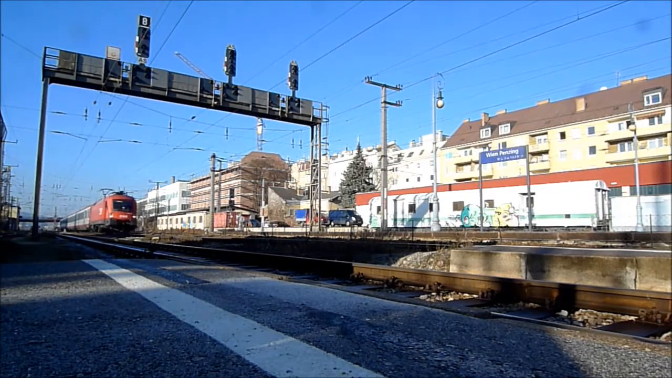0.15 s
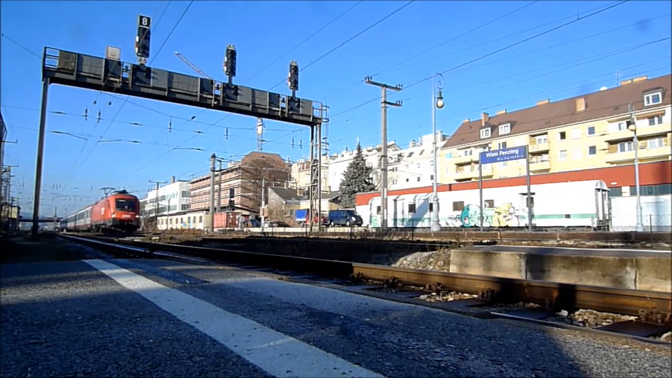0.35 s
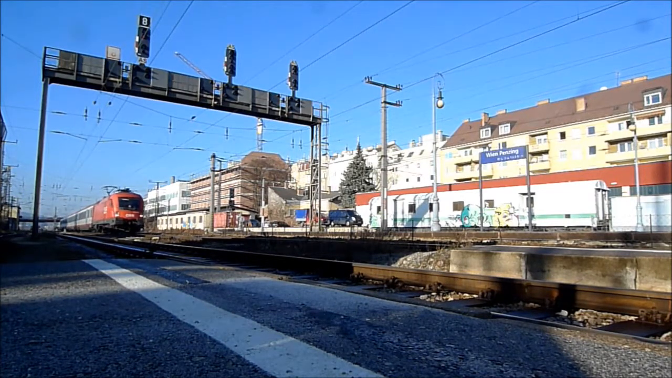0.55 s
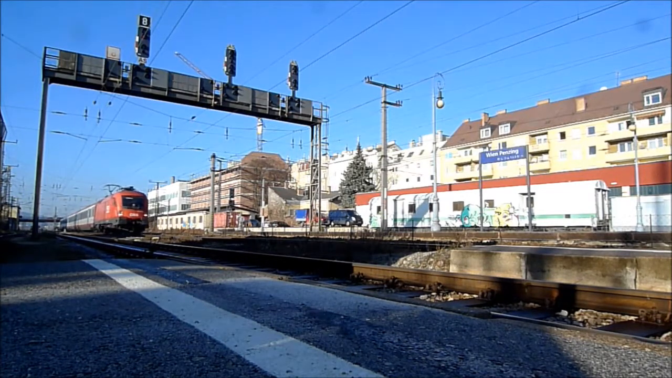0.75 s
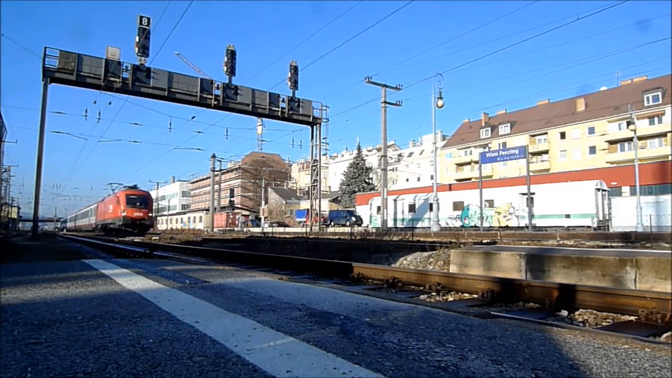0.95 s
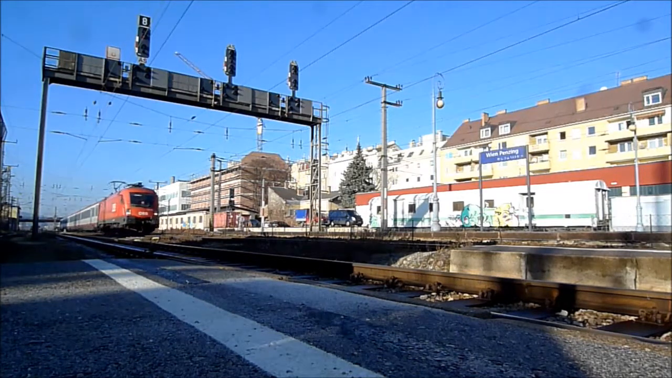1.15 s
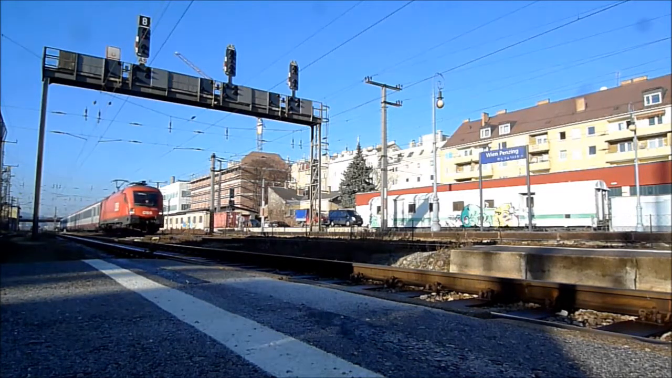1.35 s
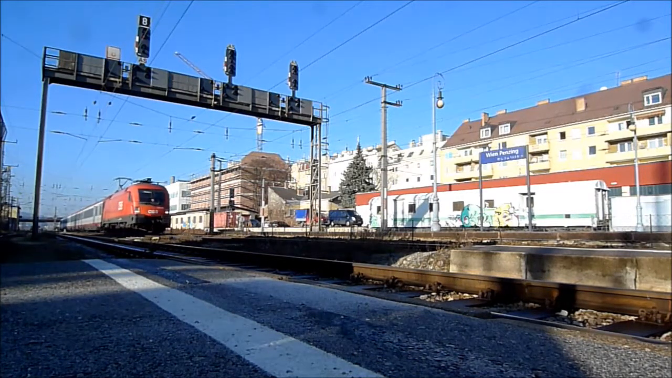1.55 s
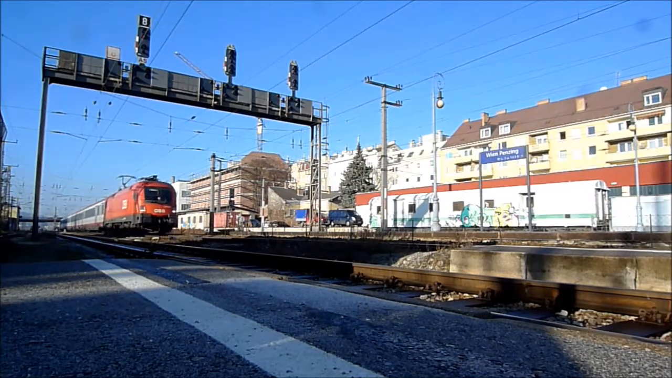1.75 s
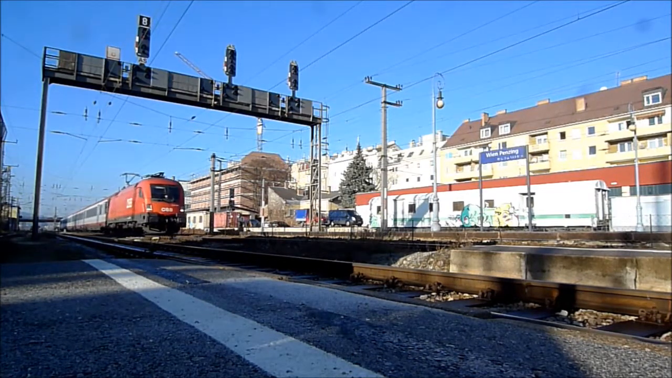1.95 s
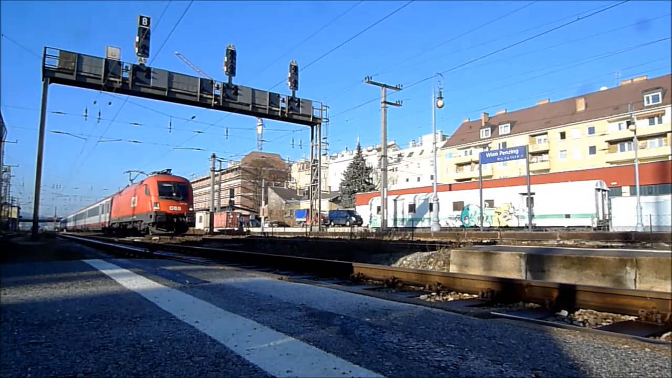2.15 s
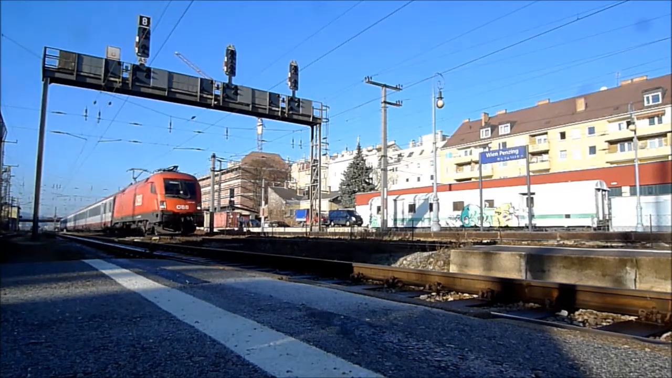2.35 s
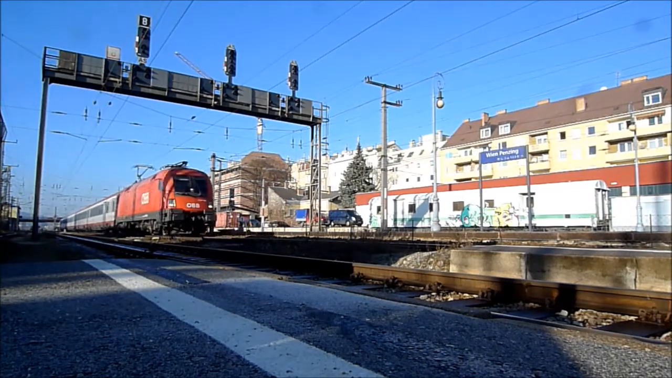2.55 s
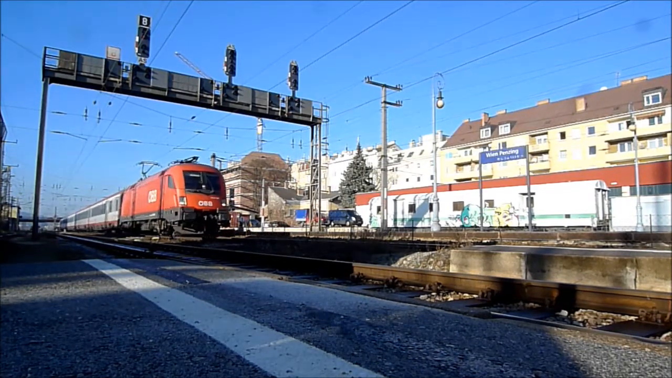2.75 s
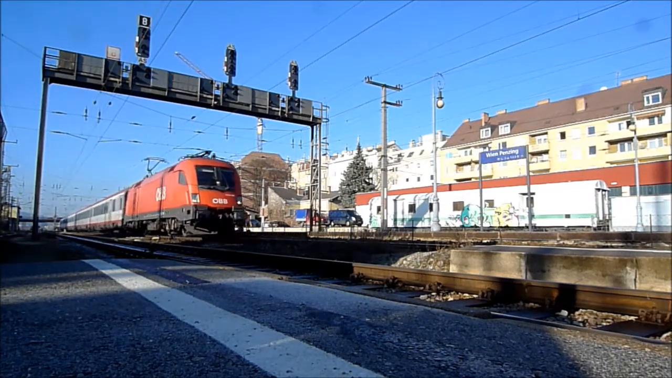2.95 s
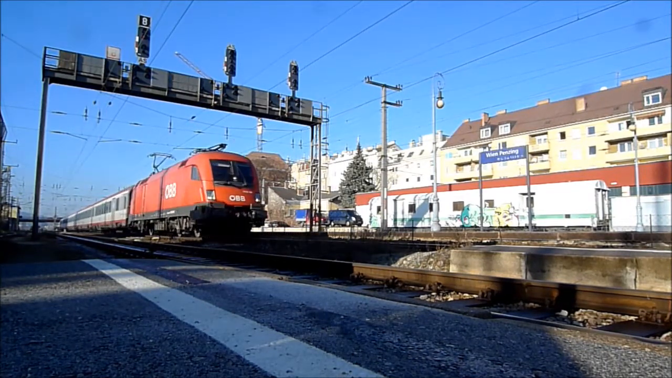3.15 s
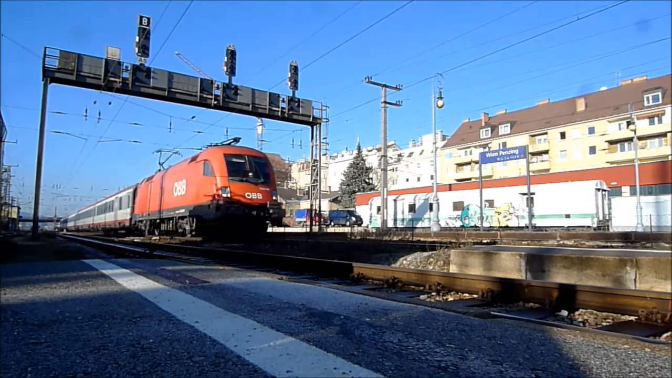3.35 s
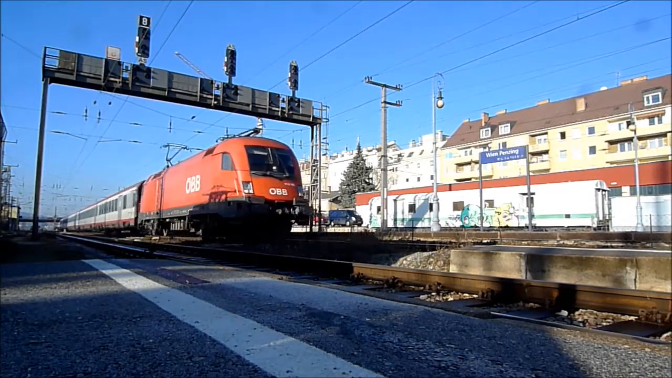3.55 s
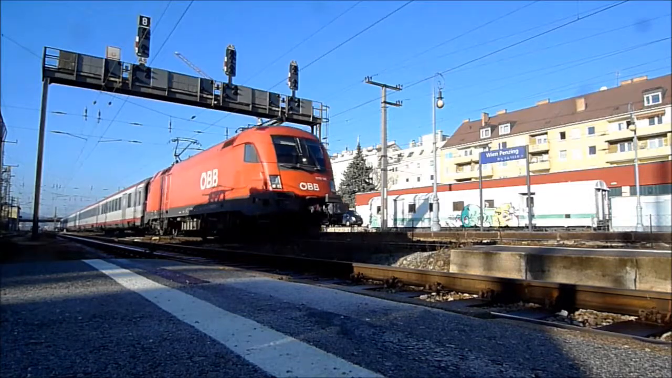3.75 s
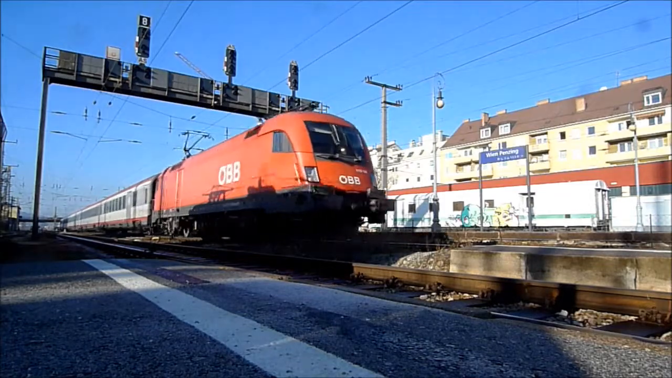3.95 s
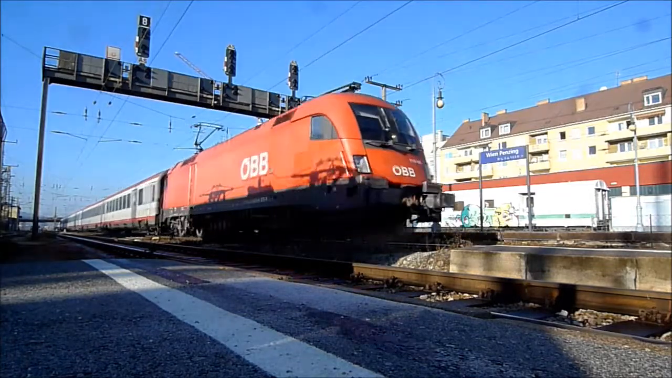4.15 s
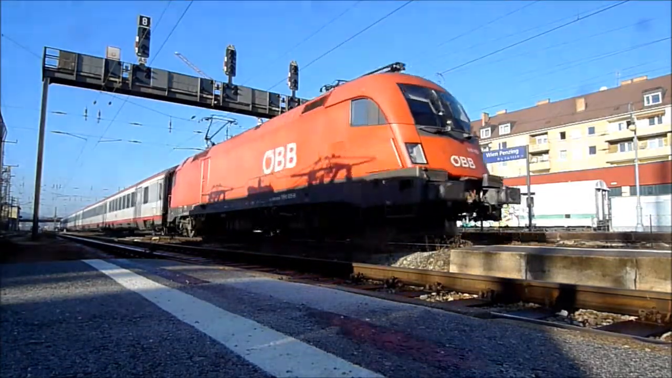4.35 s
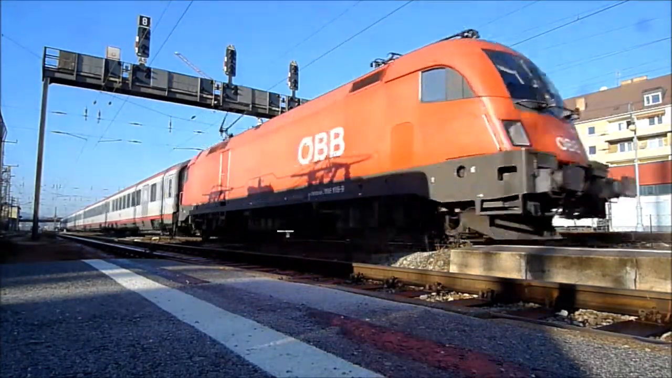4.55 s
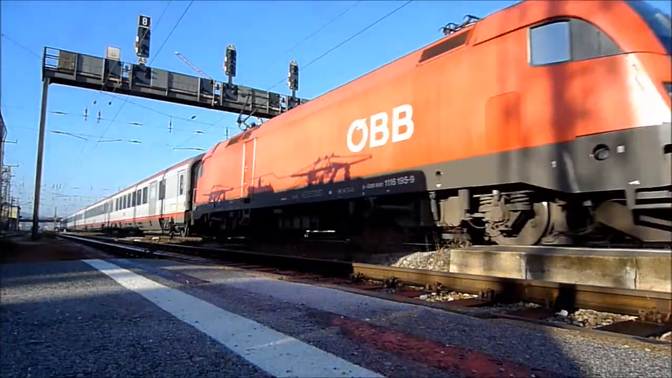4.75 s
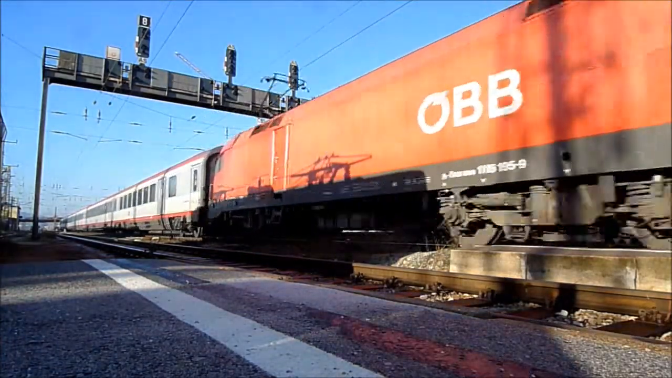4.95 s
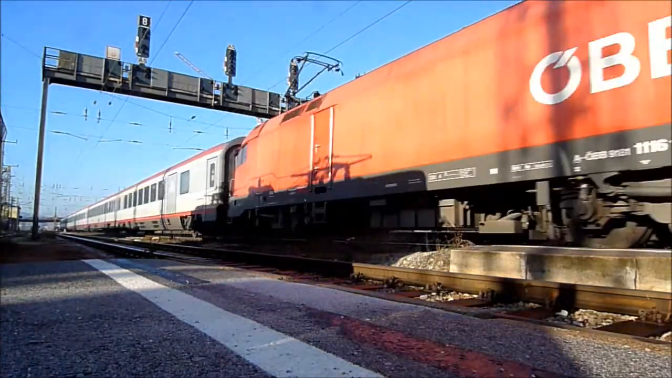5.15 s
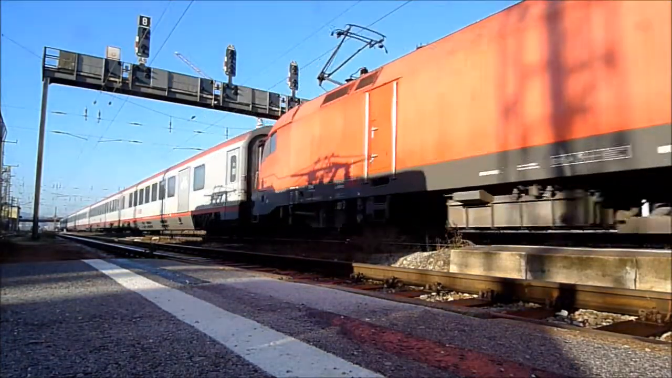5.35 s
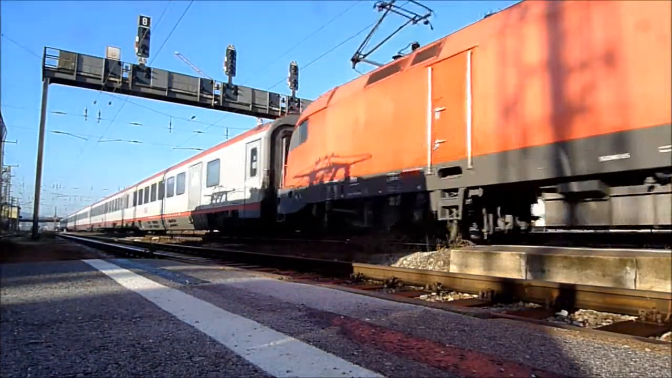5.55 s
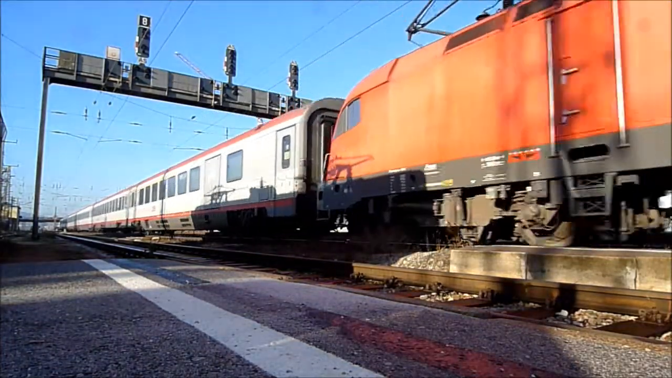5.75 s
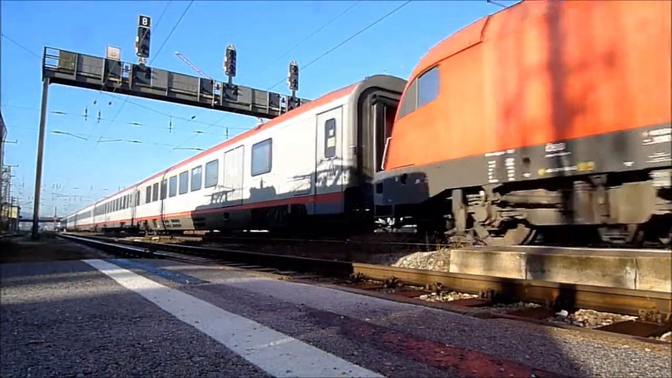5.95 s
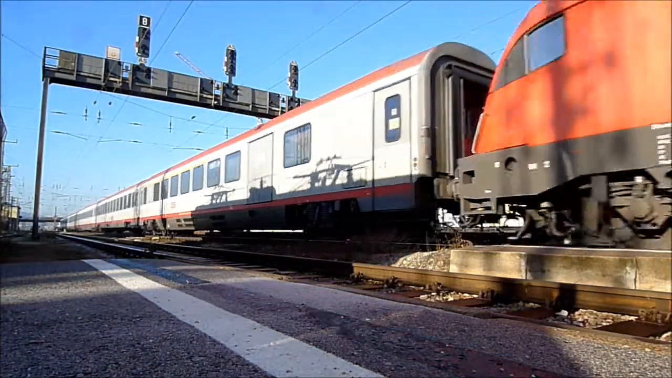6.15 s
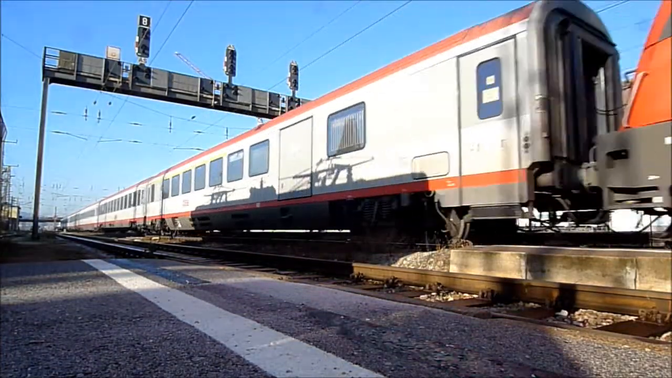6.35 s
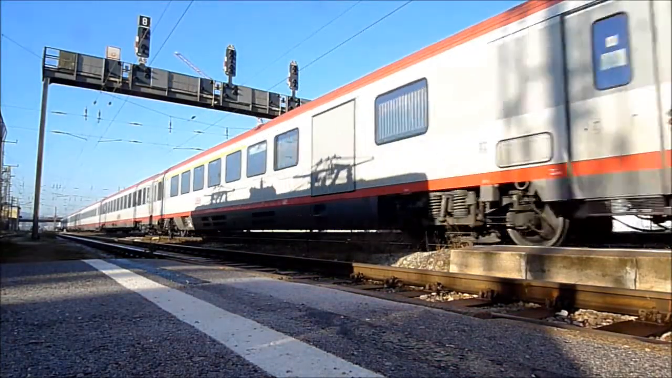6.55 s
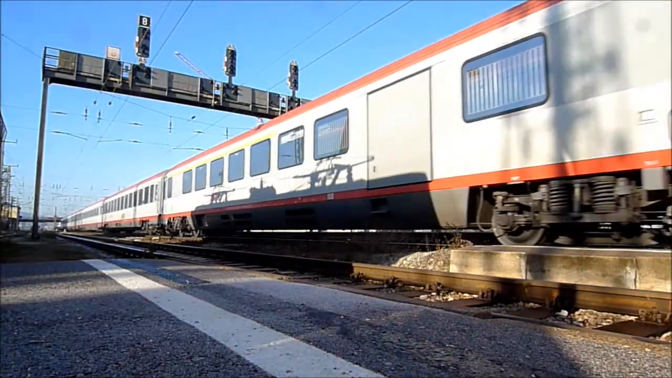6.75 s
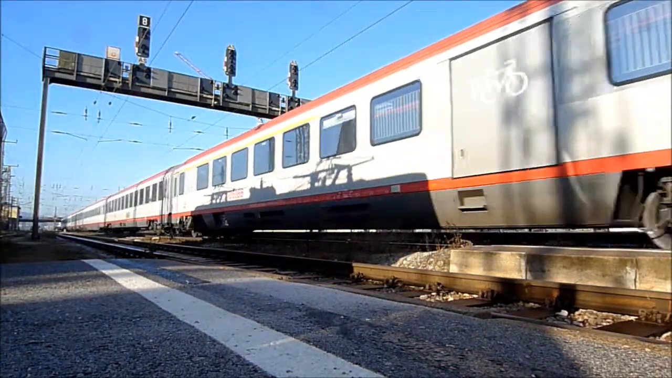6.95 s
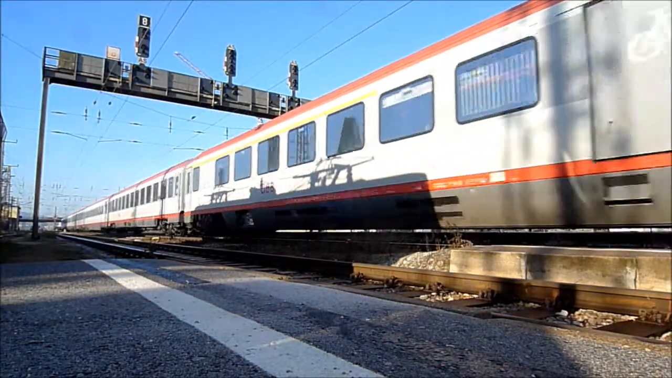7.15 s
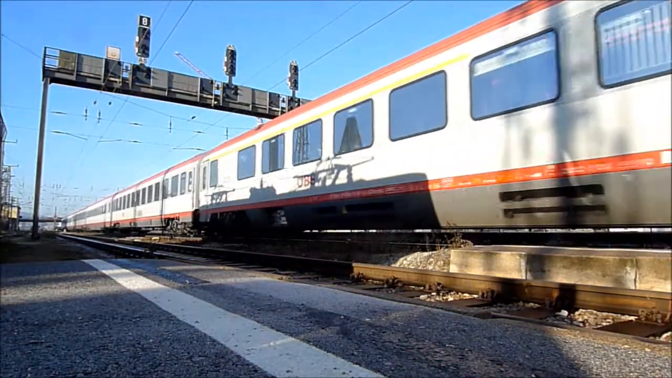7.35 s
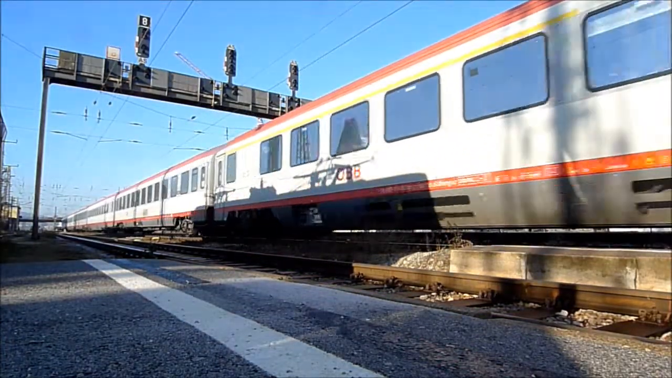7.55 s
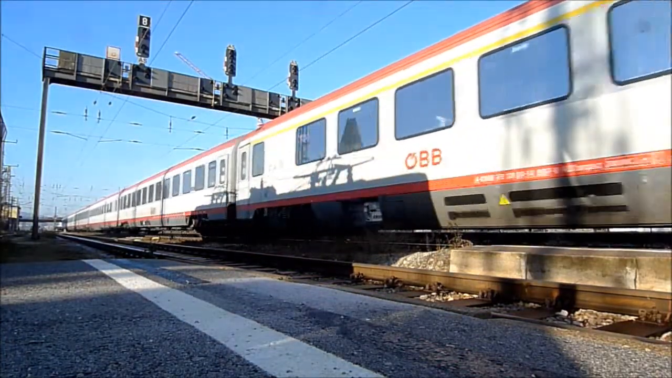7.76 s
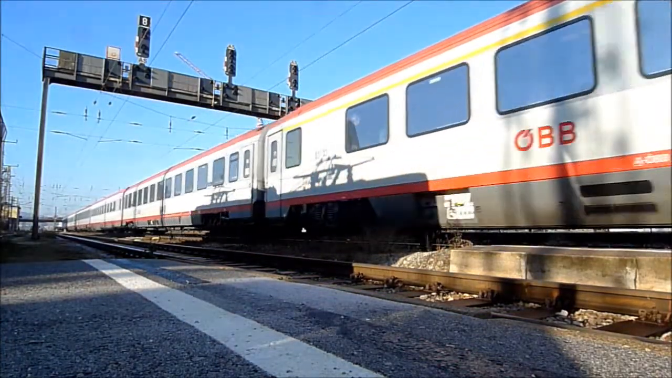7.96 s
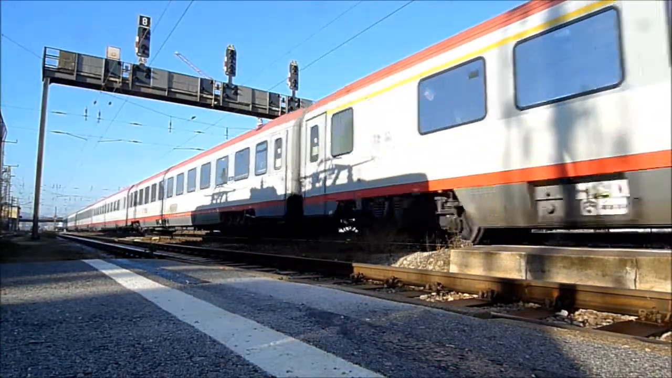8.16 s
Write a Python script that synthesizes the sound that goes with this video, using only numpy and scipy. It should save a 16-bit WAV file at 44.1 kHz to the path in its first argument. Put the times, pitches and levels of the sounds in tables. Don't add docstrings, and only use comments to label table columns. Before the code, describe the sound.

A mono outdoor sound from a fixed, low microphone beside a station track, muffled on top with faint steady hiss. From 0 to 2 s a distant low rolling drone and soft machine hum, with thin high rail singing, tiny ticks near 0.5 and 1.15 s and dull knocks from about 1.1 s. Knocks strengthen at 2.4 and 3 s, the latter with a heavy ground thump. The hum rises slightly in pitch. Around 4.05 s loose metal rattles in a bright, quick cluster, then firm knocks lead to 4.8 s. From 4.3 to 6.3 s the locomotive roars past, gear hum and blower whine beating and swelling. The roar dips around 6.6 s. At 7 to 7.7 s coach wheels bring brighter hiss, metallic ringing and rapid clacks, with a sharp tick near 7.7 s. Rolling continues to the end at about 8.2 s.

```python
import sys
import numpy as np
from scipy import signal
from scipy.io import wavfile
from scipy.ndimage import uniform_filter1d

SR = 44100
rng = np.random.default_rng(int(sys.argv[2]) if len(sys.argv) > 2 else 0)


def makeup_ratio(level_db):
    decades = np.asarray(level_db, float) / 20
    return 10 ** decades


def inscribe(sig):
    pcm = np.round(np.clip(np.atleast_2d(sig).T, -1, 1) * 32767)
    wavfile.write(sys.argv[1], SR, pcm.astype(np.int16))


N = 362502


def rms_one(x):
    return x / np.sqrt(np.mean(np.abs(x) ** 2) + 1e-20)


def band_pass(x, order, low_hz, high_hz):
    return signal.sosfilt(signal.butter(order, [low_hz, high_hz], "band", fs=SR, output="sos"), x)


def in_time(rows):
    s, *columns = np.transpose(rows)
    return [np.interp(np.arange(N) / SR, s, column) for column in columns]


def drift(rate_hz):
    every = 40
    pole = np.exp(-2 * np.pi * every * rate_hz / SR)
    noise = rng.standard_normal(N // every + 2002)
    slow = signal.lfilter([1], [1, -2 * pole, pole * pole], noise)[2000:]
    return np.interp(np.arange(N) / every, np.arange(len(slow)), rms_one(slow))


def beating_tone(hz, width_hz, rough):
    rough = np.clip(rough, 0, 1)
    phase = 2 * np.pi * np.cumsum(hz * np.ones(N)) / SR
    in_phase = np.sqrt(2 - 2 * rough) + np.sqrt(rough) * drift(width_hz)
    quadrature = np.sqrt(rough) * drift(width_hz)
    return in_phase * np.cos(phase) - quadrature * np.sin(phase)


def passing_db(closest_s, reach_s):
    return -10 * np.log10(1 + ((np.arange(N) / SR - closest_s) / reach_s) ** 2)


def beams(rows, width_s):
    return np.sqrt(sum(makeup_ratio(2 * (db + 2 * passing_db(s, width_s))) for s, db in rows))


# time in seconds, level in dB
DRONE = [(0.0, -37), (0.89, -36), (1.03, -31), (1.67, -34), (1.88, -32), (2.38, -31.5), (4.26, -27),
         (4.3, -24), (4.95, -26), (5.93, -29.5), (6.55, -31.5), (6.78, -33.5), (7.26, -25.5), (7.9, -25.5),
         (8.22, -22)]
# closest moment in seconds, level in dB, reach in seconds
WHEELSETS = [
    (4.6, -0.9, 0.89),
    (5.3, -6.5, 0.26),
    (6.1, -1, 0.54),
    (7.35, -4.5, 0.3),
    (8.9, -2, 0.92),
]


def regions():
    rumble_db = passing_db(closest_s=3.97, reach_s=1.8)
    near = [makeup_ratio(2 * (db + passing_db(s, reach))) for s, db, reach in WHEELSETS]
    rail_db = 10 * np.log10(sum(near))
    coach_hiss_db, track_hiss_db = 4, -18
    hiss = sum(near[:3]) + makeup_ratio(2 * coach_hiss_db) * sum(near[3:]) + makeup_ratio(2 * track_hiss_db)
    return np.array([rumble_db, in_time(DRONE)[0], 0.97 * rail_db, 1.59 * 10 * np.log10(hiss)])


REGION_HZ = (65, 250, 900, 2900)
# frequency in Hz, level in dB
ROAR = [(25, -16), (50, -8.5), (90, -7.5), (200, -1.5), (350, -5), (460, -7), (640, -8.5), (760, -14),
        (1100, -14), (1600, -15), (2300, -14.5), (3800, -30.5), (4300, -42), (5200, -47)]


def rolling(patchy_db):
    roar_db = -26.5
    swell = regions()
    swell = swell - 10 * np.log10(np.mean(makeup_ratio(2 * swell), axis=1, keepdims=True))
    edges_hz = 22 * 2 ** (np.arange(25) / 3)
    roar_log_hz, roar_levels_db = np.log(np.array(ROAR)[:, 0]), np.array(ROAR)[:, 1]
    white, together = rng.standard_normal((2, N)), drift(3.3)
    still = moving = 0
    for k, (low, high) in enumerate(zip(edges_hz, edges_hz[1:])):
        log_hz = np.log(np.sqrt(low * high))
        band = band_pass(white[k % 2], 2, low, high)
        band = band * makeup_ratio(np.interp(log_hz, roar_log_hz, roar_levels_db))
        share = [np.interp(log_hz, np.log(REGION_HZ), row) for row in np.eye(len(REGION_HZ))]
        flicker_db = patchy_db * (0.99 * together + drift(12))
        still = still + band
        moving = moving + band * makeup_ratio(share @ swell + flicker_db)
    return makeup_ratio(roar_db) * moving / np.std(still)


# time in seconds, gear mesh in Hz, blower blade tone in Hz
PITCH = [(0, 254, 609), (1.8, 260, 609), (3.5, 270, 612), (4.2, 275, 615), (5, 276, 619), (5.6, 271, 616),
         (6.45, 272, 603), (7.1, 273, 613), (8.22, 275, 616)]
# time in seconds, level in dB
GEARS = [(0, -37.5), (1.3, -42), (2.6, -34), (3.2, -37.5), (3.55, -19), (3.7, -38), (3.85, -22),
         (4.25, -23), (4.32, -32), (5.15, -25.5), (5.3, -18.5), (5.9, -19.5), (6.1, -27), (6.75, -24.5),
         (7.25, -27), (7.4, -23), (7.75, -27), (8.22, -28)]
# moment in seconds, level in dB
GEAR_BEAMS = [(.0, -43.5), (.8, -38.5), (1.35, -36.5), (1.9, -37), (2.6, -34), (3.2, -30.5), (3.5, -26.5),
              (4.05, -28), (4.25, -26.5), (4.6, -28), (4.95, -23), (5.45, -28), (5.8, -28.5), (6.35, -29),
              (6.8, -31), (7.4, -34.5), (7.65, -34)]


def gears():
    hz, first_db = in_time(PITCH)[0], in_time(GEARS)[0]
    first = beating_tone(hz, width_hz=20, rough=.45)
    second = beating_tone(2 * hz, width_hz=18, rough=.3)
    first_gain = makeup_ratio(first_db - 4.0 + 0.25 * drift(10.0))
    return first_gain * first + beams(GEAR_BEAMS, width_s=.17) * second


# time in seconds, level in dB
BLOWERS = [(0, -40), (1, -42.5), (1.7, -36.5), (2.2, -39.5), (2.9, -33), (3.66, -33), (3.94, -27),
           (4.2, -31), (5.0, -29), (5.45, -23), (5.75, -26), (6.0, -27), (6.45, -23), (6.6, -31.5),
           (6.95, -36.5), (7.35, -30), (7.7, -38.5), (8.22, -41)]
# moment in seconds, level in dB
OUTLETS = [(.4, -47), (1.1, -44), (1.6, -44.5), (2.1, -42), (2.6, -42), (3.2, -41.5), (3.75, -38.5),
           (4.05, -38), (4.4, -31.5), (4.7, -34), (4.93, -30), (5.08, -25.5), (5.53, -31), (5.8, -30.5),
           (6.08, -30.5), (6.45, -35.5), (6.9, -35.5), (7.25, -38.5), (8.0, -43)]


def blowers():
    hz, first_db = in_time(PITCH)[1], in_time(BLOWERS)[0]
    first = beating_tone(hz, width_hz=22, rough=.45)
    second = beating_tone(2.008 * hz, width_hz=30, rough=.42)
    third = beating_tone(3.012 * hz, width_hz=60, rough=1)
    slow_s, under_db, abeam_db = 1.4, -17, 9
    third_db = uniform_filter1d(first_db, int(slow_s * SR)) + under_db
    third_db = third_db + abeam_db * makeup_ratio(2 * passing_db(closest_s=5.3, reach_s=1.4))
    first_gain = makeup_ratio(first_db + 0.6 + 0.2 * drift(2.6))
    return first_gain * first + beams(OUTLETS, width_s=.18) * second + makeup_ratio(third_db) * third


# start in seconds, end in seconds, pitch in Hz, width in Hz, level in dB
WHINES = [(-1, 3.2, 184, 10, -43), (.6, 3.8, 1560, 35, -51), (5.2, 7.4, 1385, 25, -41),
          (4.2, 6.4, 2790, 50, -46), (4.0, 6.4, 2400, 70, -39), (7.22, 7.55, 4610, 25, -46),
          (7.55, 8.8, 4850, 40, -56), (7.7, 8.8, 2300, 60, -41), (3.6, 5.2, 345, 35, -32),
          (5.2, 6.1, 250, 20, -31), (4.3, 5.4, 1912, 14, -41), (4.3, 6.2, 1650, 20, -45),
          (-.6, .8, 740, 50, -48)]


def whines():
    t, out = np.arange(N) / SR, 0
    for start, end, hz, width, db in WHINES:
        swell = np.sin(np.pi * np.clip((t - start) / (end - start), 0, 1))
        out = out + makeup_ratio(db) * swell * beating_tone(hz, width, rough=1.0)
    return out


WHEEL_HZ = (1590, 1885, 2215, 2700, 2935, 3345, 3770, 3980, 4660, 5420)
# width in Hz, level in dB
WHEEL = [(40, 2), (30, -7), (55, 2), (50, -5), (40, -4), (38, -2.5), (30, -10), (45, -12), (45, -11),
         (55, -10)]
# time in seconds, ringing level in dB, pitch ratio
BOGIE = [(6.2, -60, 1.012), (6.7, -36.5, 1.01), (7, -31.5, 1.006), (7.3, -29.5, .998), (7.65, -32, .99),
         (7.75, -38, .99), (8.22, -36, .99)]


def wheel_ring():
    ring_db, ratio = in_time(BOGIE)
    off_db = ring_db - ring_db.max()
    modes = 0
    for hz, (width, db) in zip(WHEEL_HZ, WHEEL):
        gain = makeup_ratio(db + off_db * hz / 2500)
        modes = modes + gain * beating_tone(hz * ratio, width, rough=1)
    return makeup_ratio(ring_db.max() - 7.5) * modes


def while_on(rows):
    attack_s, release_s = .04, .15
    t, gain = np.arange(N) / SR, 0
    for start, end, db in rows:
        ramp = np.minimum((t - start) / attack_s, 1 + (end - t) / release_s)
        gain = gain + makeup_ratio(db) * np.clip(ramp, 0, 1)
    return gain


# pitch in Hz, level in dB
UPPER = [(3722, 0), (3770, -3), (3935, -11)]
# start in seconds, end in seconds, level in dB
LOWER_ON = [
    (.75, 1.3, -63),
    (1.7, 2.3, -52.5),
    (2.3, 4.0, -62),
]
UPPER_ON = [
    (-.5, 1.7, -65),
    (.72, .95, -63),
    (1.7, 2.4, -56),
    (2.4, 3.9, -56.5),
    (3.9, 5.5, -53.5),
]
LATE_ON = [
    (1.0, 3.2, -63),
    (2.2, 2.45, -57),
    (3.2, 5.5, -51),
]


def singing_rail():
    upper = sum(beating_tone(hz, width_hz=22, rough=.75) * makeup_ratio(db) for hz, db in UPPER)
    lower = beating_tone(3520, width_hz=16, rough=.8)
    late = beating_tone(3090, width_hz=26, rough=.9)
    return while_on(LOWER_ON) * lower + while_on(UPPER_ON) * upper + while_on(LATE_ON) * late


def blows(table, t60, spread, crack, trim_db):
    out = np.zeros(N + SR)
    luck = rng.uniform(-1, 1, (len(table), 5))
    t = np.arange(int(2 * t60 * SR)) / SR
    for (s, db, hz), detune in zip(table, luck):
        ring = 0
        for k, d in enumerate(detune):
            mode_hz = hz * np.exp(spread * (k - 2.1 + .3 * d))
            ring = ring + np.sin(2 * np.pi * mode_hz * t) * np.exp(-.4 * (k - 1.7) ** 2)
        ring = ring * makeup_ratio(-60 * t / t60) * (1 - np.exp(-t * hz))
        burst = crack * np.sin(np.pi * hz * t) * np.exp(-t * hz)
        at = round(s * SR)
        out[at:at + len(t)] += makeup_ratio(db + trim_db) * (ring / np.max(np.abs(ring)) + burst)
    return out[:N]


# time in seconds, peak in dB, centre in Hz
KNOCKS = [(1.094, -19, 260), (1.643, -18, 145), (1.894, -16, 227), (1.996, -19, 170), (2.428, -10, 170),
          (2.966, -8, 290), (4.036, -15, 269), (4.065, -21, 273), (4.241, -9, 272), (4.469, -6, 248),
          (4.791, -3, 323), (7.046, -6.5, 262), (7.281, -14, 277), (7.388, -9, 253), (7.479, -6, 269),
          (7.617, -10, 249), (7.663, -3, 258), (7.943, -10, 302)]
# time in seconds, peak in dB, centre in Hz
THUMPS = [
    (2.43, -37, 110),
    (2.965, -9, 98),
    (4.3, -19.5, 108),
    (4.79, -11, 150),
]


def rail_joints():
    knocks = blows(KNOCKS, t60=0.079, spread=0.11, crack=0, trim_db=-8)
    return knocks + blows(THUMPS, t60=0.15, spread=0.24, crack=0, trim_db=-11)


# time in seconds, peak in dB, centre in Hz
TICKS = [(0.0646, -26, 1820), (0.4905, -19.5, 2130), (0.496, -34, 2050), (1.1533, -29, 1390),
         (1.1564, -28, 2000), (1.1604, -27, 1480), (1.165, -33, 1930), (1.1704, -39, 1810),
         (1.9164, -32, 1880), (1.9555, -23, 1610), (3.3664, -31, 1500), (4.0314, -21, 2120),
         (4.039, -25, 1700), (4.0424, -11.5, 1600), (4.0484, -20, 1620), (4.0534, -16, 1450),
         (4.057, -14, 1660), (4.0673, -17, 2130), (4.0704, -11, 2290), (4.079, -25, 2440),
         (4.0864, -25, 2240), (4.0917, -23, 2220)]
# time in seconds, peak in dB, centre in Hz
SNAPS = [(1.1654, -33, 3700), (1.1754, -39, 2840), (1.4721, -28, 2930), (2.7791, -22.5, 2870),
         (2.8444, -22, 2920), (2.97, -29, 3700), (2.9774, -40, 2840), (2.985, -26, 3780),
         (3.1168, -21, 2800), (3.1244, -20.5, 2920), (3.2794, -45, 3060), (4.0677, -19, 2780),
         (4.0864, -20, 3580), (7.7344, -11, 2900)]
# time in seconds, peak in dB, centre in Hz
RINGS = [
    (.496, -27, 2100),
    (4.038, -17, 1850),
    (4.0685, -12, 2250),
    (4.078, -14, 2540),
    (4.087, -14, 2210),
]


def loose_metal():
    ticks = blows(TICKS, t60=0.0066, spread=.2, crack=.3, trim_db=0)
    snaps = blows(SNAPS, t60=0.0069, spread=.12, crack=.2, trim_db=-2.5)
    return ticks + snaps + blows(RINGS, t60=.04, spread=.02, crack=0, trim_db=-2)


# start in seconds, length in seconds, level in dB, centre in Hz
RATTLES = [
    (0.066, .012, -40, 1900),
    (0.487, 0.012, -37, 1300),
    (1.151, 0.027, -34.5, 1290),
    (2.97, 0.028, -41, 3300),
    (4.034, 0.028, -32, 1500),
    (4.074, 0.024, -33, 2300),
]


def rattles():
    out = np.zeros(N)
    size = 4000
    for s, length, db, hz in RATTLES:
        uneven = makeup_ratio(5 * rng.exponential(1, size).clip(0, 3))
        grit = rng.standard_normal(size) * uneven * (np.arange(size) < length * SR)
        grit = band_pass(grit, 2, hz / 1.65, hz * 1.42)
        out[round(s * SR):][:size] += makeup_ratio(db) * rms_one(grit) * np.sqrt(length * SR / size)
    return out


RAIL_FIZZ_HZ = (3150, 4000)


def rail_fizz():
    fizz = band_pass(rng.standard_normal(N), 3, *RAIL_FIZZ_HZ)
    return makeup_ratio(-46.5 + passing_db(closest_s=5.0, reach_s=2.2)) * rms_one(fizz)


def scene():
    train = rolling(patchy_db=.7) + gears() + blowers() + whines() + wheel_ring() + singing_rail()
    struck = rail_joints() + loose_metal() + rattles()
    return (train + struck + rail_fizz())[None]


def band_limit(x):
    return signal.sosfilt(signal.butter(12, 8100, fs=SR, output="sos"), x)


def record(dry):
    mic = signal.sosfilt(signal.butter(10, 4050, fs=SR, output="sos"), dry)
    mic = signal.sosfilt(signal.butter(2, 38, "high", fs=SR, output="sos"), mic)
    hiss = makeup_ratio(-59) * rng.standard_normal(N)
    whistle = makeup_ratio(-89.5) * np.sqrt(2) * np.sin(2 * np.pi * 6666 * np.arange(N) / SR)
    mix = signal.sosfilt(signal.cheby2(12, 60, 8740, fs=SR, output="sos"), mic + hiss + whistle)
    fade_out = np.minimum(np.arange(N)[::-1] / 60, 1)
    mix = mix * fade_out - .0078
    return band_limit(mix)


dry = scene()
out = record(dry)
inscribe(out)
```